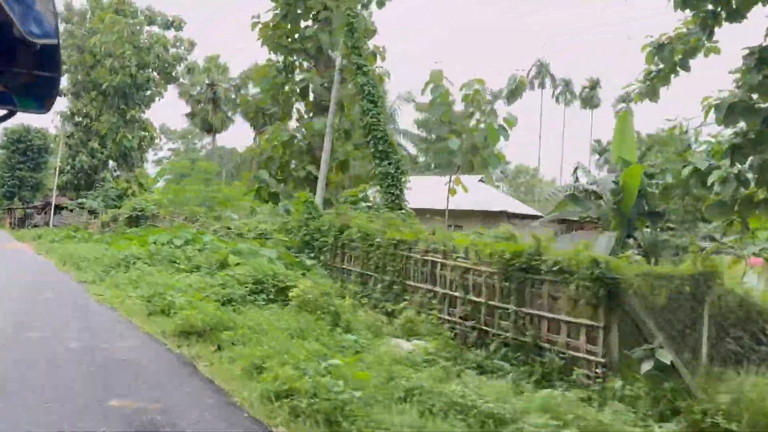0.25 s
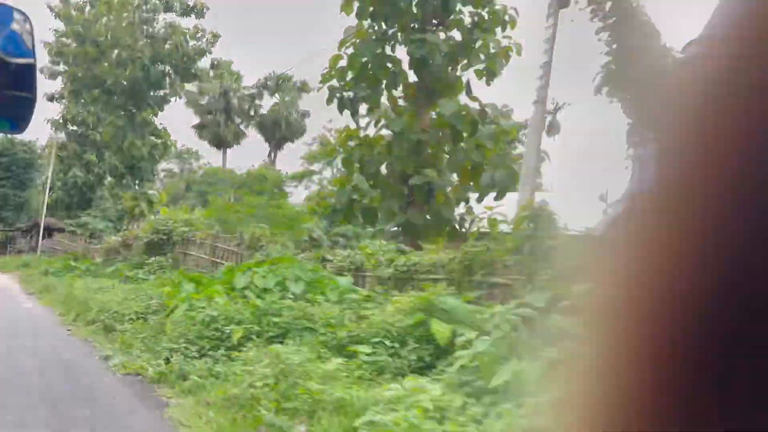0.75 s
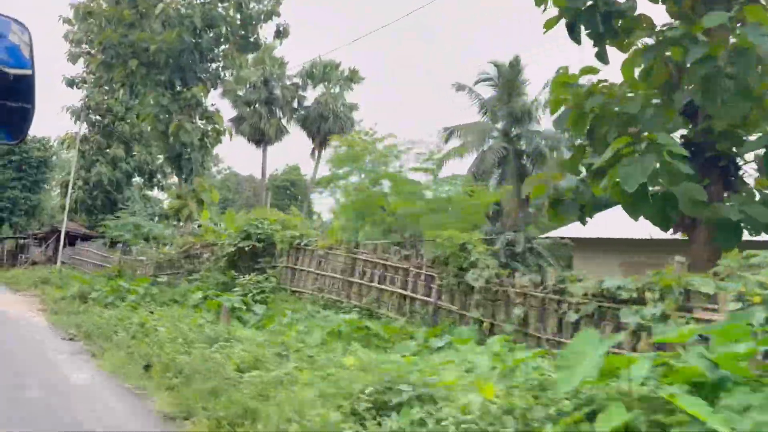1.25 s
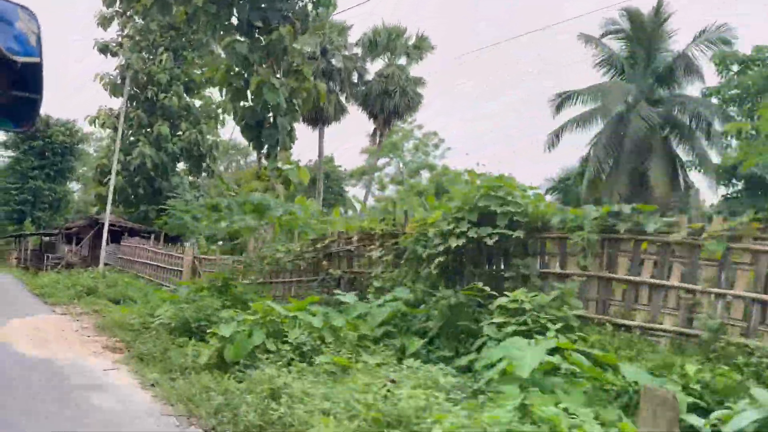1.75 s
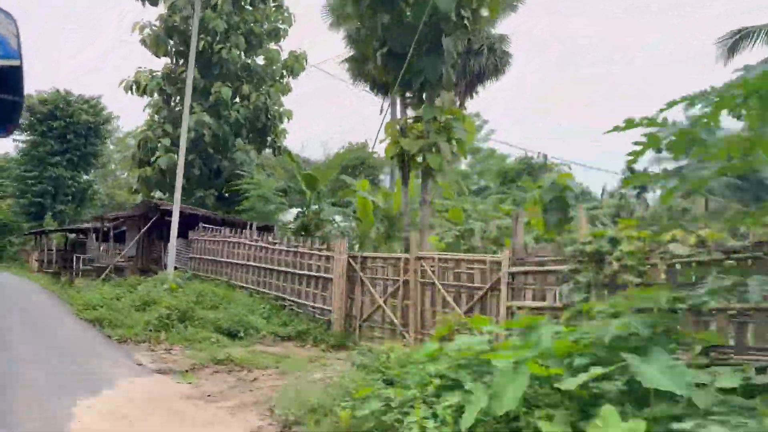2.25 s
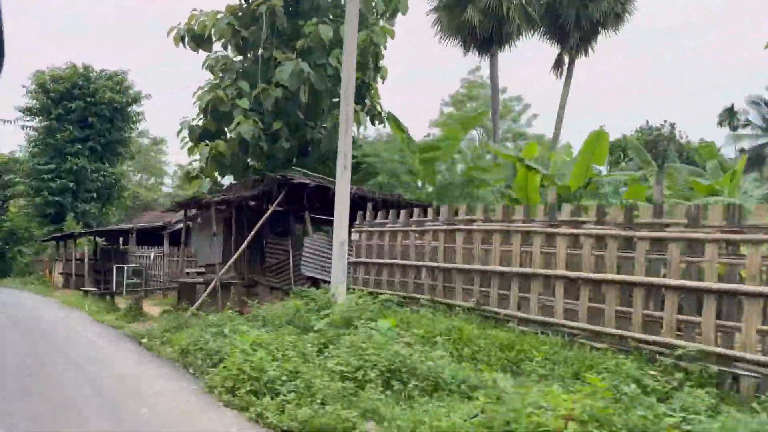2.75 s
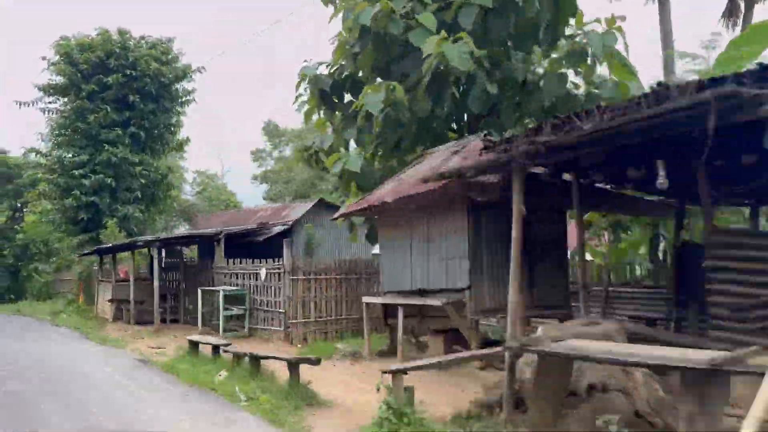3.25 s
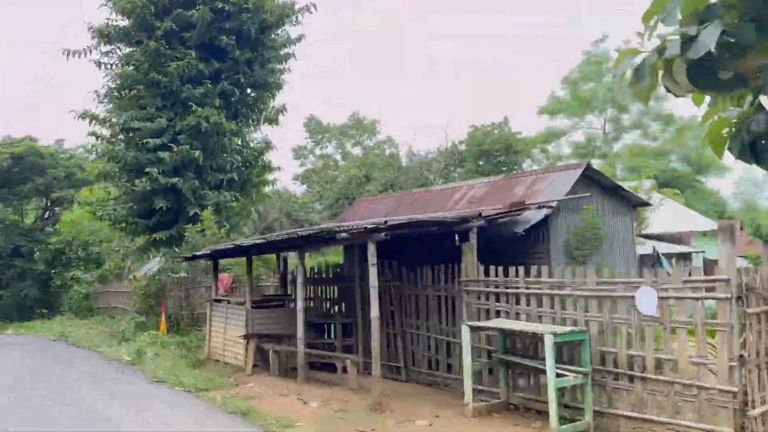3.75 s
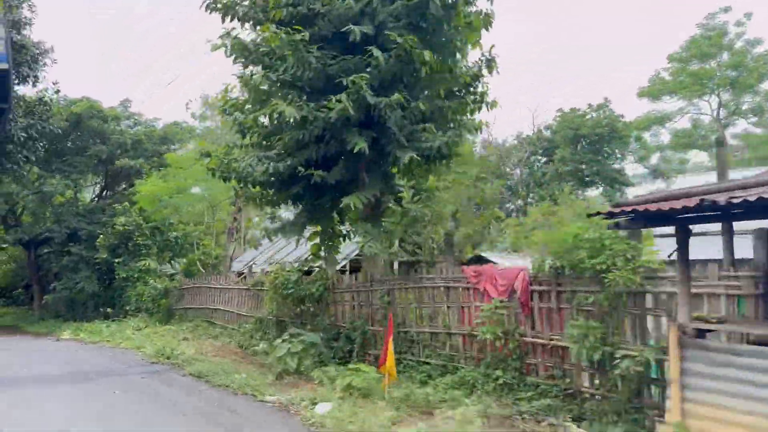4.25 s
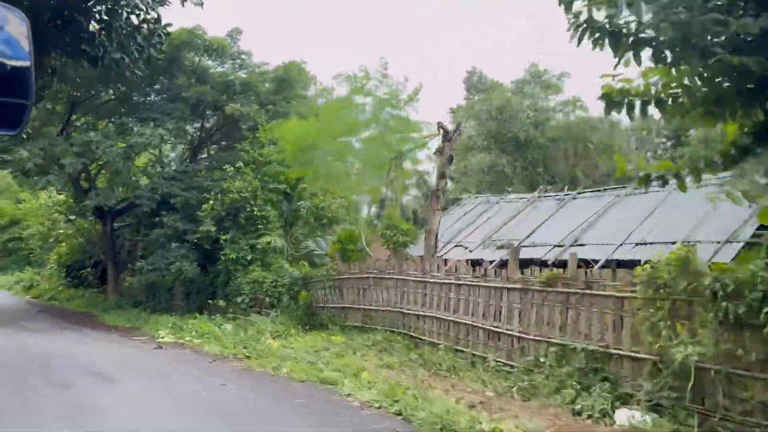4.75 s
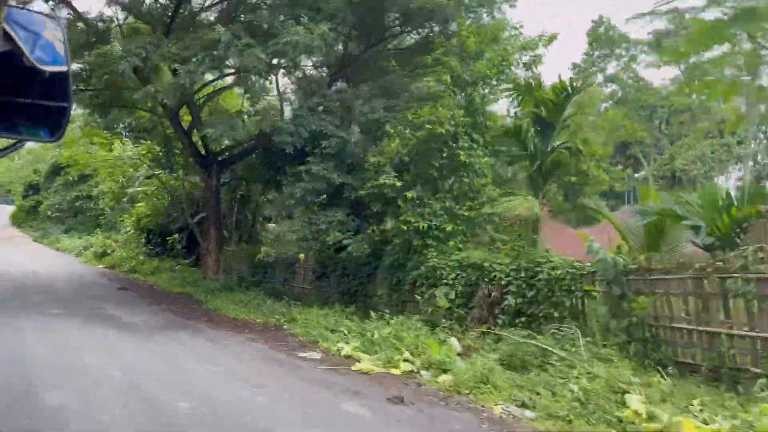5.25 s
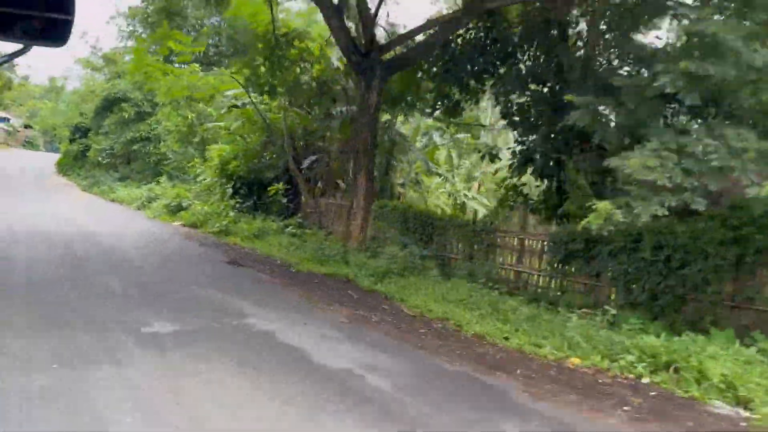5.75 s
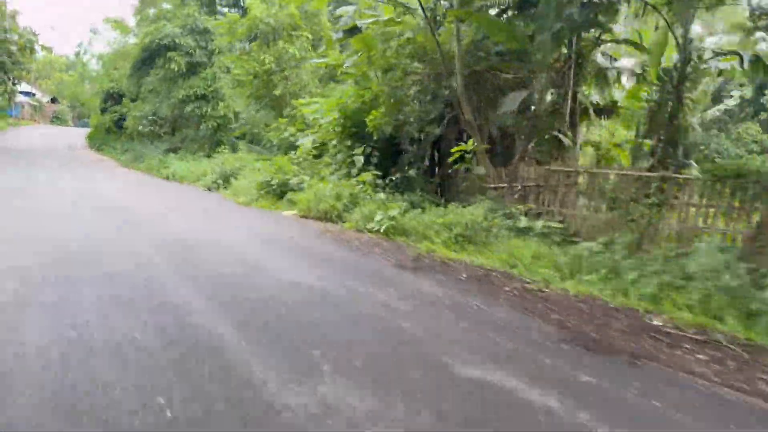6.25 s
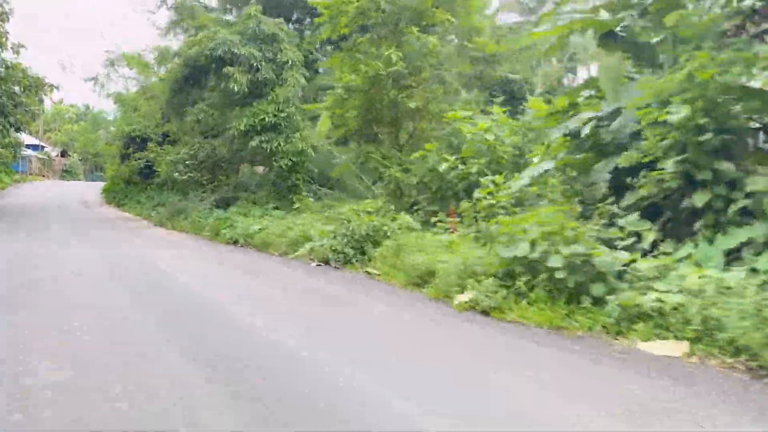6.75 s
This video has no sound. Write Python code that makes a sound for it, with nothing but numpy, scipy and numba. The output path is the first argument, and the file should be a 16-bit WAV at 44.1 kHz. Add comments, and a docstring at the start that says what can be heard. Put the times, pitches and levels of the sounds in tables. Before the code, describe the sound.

Close, slightly overloaded wind noise on an exposed phone microphone, in stereo, outdoors in a moving vehicle. Low gusts surge and sink while brighter crackles spit in clusters, thickest in the opening half second and the last two seconds. Behind it lies a quiet, slowly rising hiss of tyres and motor, with a few barely audible thin whistles, perhaps roadside birds or insects.

```python
"""A village road, from a phone held out of a small vehicle: the head wind tumbles over its microphone ports.
Big eddies rumble and smaller ones flutter, as noise whose level and treble wander with the wind.
The sharpest burst as crackling pops, noise bursts that start bright and end in a thump.
Tyres and motor hiss underneath as steady filtered noise; a few faint whistles, wavering sines, pass by."""
import sys
import numpy as np
from scipy import signal
from scipy.fft import rfft, irfft
from scipy.io import wavfile
from scipy.ndimage import uniform_filter1d
from numba import njit

SR = 44100
rng = np.random.default_rng(int(sys.argv[2]) if len(sys.argv) > 2 else 0)


def put_to_file(sound):
    """Save the sound as 16-bit audio at rate SR, in the file named by the first command-line argument."""
    columns = np.atleast_2d(sound).T  # one column per channel
    safe = np.clip(columns, -1, 1)
    whole_steps = np.round(safe * 32767)
    wavfile.write(sys.argv[1], SR, whole_steps.astype(np.int16))


N = 309141  # samples, about 7 s


def undb(db):
    """Decibels to amplitude."""
    return 10 ** (np.asarray(db) / 20)


def unit(x):
    """Scale to an rms of 1."""
    return x / np.sqrt(np.mean(x ** 2))


def noise(shape):
    """Noise of rms 1 with a spectrum given as (Hz, dB) points."""
    hz, db = np.transpose(shape)
    bins = np.fft.rfftfreq(N, 1 / SR) + 1  # 1 Hz up, to keep the logarithm finite
    gain = undb(np.interp(np.log(bins), np.log(hz), db, right=-150))
    return unit(irfft(rfft(rng.standard_normal(N)) * gain, N))


def walk(rate):
    """Random levels, each held 1 / rate s, then slewed twice; spread 1."""
    hold = max(int(SR / rate), 2)
    steps = np.repeat(rng.standard_normal(N // hold + 1), hold)
    return unit(uniform_filter1d(uniform_filter1d(steps, hold), hold)[:N])


def even(x, ms):
    """Iron out the chance swells of a noise over a few ms, so that an envelope sets its level."""
    return x / np.sqrt(uniform_filter1d(x ** 2, int(ms * SR / 1000)) + 0.22)


@njit
def lowpass(x, hz):
    """State-variable low-pass whose corner moves every sample."""
    y, band, low = np.empty(len(x)), 0., 0.
    for i in range(len(x)):
        g = np.tan(np.pi * hz[i] / SR)
        v = (band + g * (x[i] - low)) / (1 + g * (g + 1.4))
        y[i] = low + g * v
        band, low = 2 * v - band, low + 2 * g * v
    return y


# The wind at the phone between the puffs. Each row: time in seconds, rumble level in dB, flutter level in dB.
WIND = [(0, -24.5, -32), (.5, -31.5, -35.5), (.9, -28, -32.5), (1.1, -29, -37.5), (1.55, -29, -35),
        (1.72, -31, -40.5), (2.03, -29, -32), (2.18, -39, -39), (2.32, -40.5, -36.5), (2.45, -26.5, -32),
        (2.58, -35, -38.5), (2.66, -32, -30.5), (2.74, -35, -37.5), (2.85, -27, -31), (3.0, -28.5, -33),
        (3.65, -27.5, -33.5), (3.95, -33.5, -37.5), (4.15, -32, -34.5), (4.33, -30.5, -34.5),
        (4.6, -26, -29.5), (4.82, -27, -29), (5.1, -26, -32.5), (5.25, -33, -40.5), (5.45, -29.5, -35),
        (5.75, -27, -32.5), (6.0, -26.5, -29), (6.5, -23.5, -27.5), (7.01, -25, -30)]


def wind():
    """The slow course of the wind, as rumble and flutter levels in dB joined by straight lines."""
    s, *columns = np.transpose(WIND)
    return [np.interp(np.arange(N) / SR, s, column) for column in columns]


# The spectrum of the big eddies at the microphone. Each row: frequency in Hz, level in dB per Hz.
RUMBLE = [(20, -18), (40, -1.5), (62, 0), (90, -2.5), (150, -13.5), (300, -19), (600, -59)]


def rumble(throb):
    """Big eddies press on the exposed port as evened deep noise; the throb is its amplitude."""
    return throb * even(noise(RUMBLE), ms=73)


# The spectrum of the smaller eddies, before the moving low-pass. Each row: frequency in Hz, level in dB per Hz.
FLUTTER = [(40, -68), (110, -18), (200, -11.5), (500, -12.5), (1200, -18.5), (4000, -28.5), (9000, -26.5)]


def flutter(db, corner_hz, swing_db):
    """Eddies sweep past at an uneven speed: fast ones are louder and brighter, slow ones dull and smooth."""
    speed = 0.18 * walk(25) + 0.66 * walk(80) + 0.81 * walk(300)
    speed = 1.6 * np.tanh(speed / 1.68)  # the sharpest eddies are the pops
    brightness_db = swing_db * speed + 0.38 * (db - db.mean())
    corner = np.clip(corner_hz * undb(brightness_db), 60, 4000)
    eddies = lowpass(lowpass(noise(FLUTTER), corner), 5.7 * corner)
    return undb(db) * unit(undb(4.96 * speed) * eddies)


# The spectrum of the low buffets. Each row: frequency in Hz, level in dB per Hz.
BUFFET = [(50, -13), (100, 0), (200, -1), (450, -32)]


def buffets(lull_db):
    """Separate low buffets on the exposed port: low noise that surges and sinks by itself."""
    surge_db = 10.2 * np.tanh(walk(30))
    return undb(lull_db - 11.0 + surge_db) * noise(BUFFET)


# How the exposed port reaches the left channel. Each row: frequency in Hz, gain in dB, phase lead in radians.
LEFT_EAR = [(0, -1.5, -.1), (500, -2, .9), (950, -6, 1.6), (1400, -13, -.3), (2200, -15, -1.1),
            (2800, -14, -1.3), (4600, -9, -.6), (5200, -8, -1.3), (6700, -4, .4), (7100, -11, 1.2),
            (7400, -2, 2.7), (8100, 0, 3.14), (16000, 0, 15.9)]


def both_ears(port):
    """The phone mixes one port into both channels: the left is phase shifted and weaker at 1 to 7 kHz."""
    hz, db, lead = np.transpose(LEFT_EAR)
    bins = np.fft.rfftfreq(N, 1 / SR)
    ear = undb(np.interp(bins, hz, db)) * np.exp(1j * np.interp(bins, hz, lead))
    return np.array([irfft(rfft(port) * ear, N), port])


# The spectrum of the road below the vehicle. Each row: frequency in Hz, level in dB per Hz.
ROAD = [(300, -12), (700, -16.5), (1000, -18), (1300, -10), (1800, -15.5), (2200, -18), (2700, -21.5),
        (3250, -26), (5000, -30.5), (7000, -36.5), (10200, -40), (11200, -42), (14300, -43.5), (15700, -51)]
ROAD_DB, SPEED_UP_DB_PER_S = -44, 0.98  # level halfway through, before gusts and wander; its steady climb
ONE_PORT_HZ = 7300  # above this, a single port serves both channels


def road(gust_db):
    """Tyre and motor hiss: unrelated left and right, but the treble comes from a single port."""
    low = signal.butter(6, ONE_PORT_HZ, fs=SR, output="sos")
    high = signal.butter(6, ONE_PORT_HZ, "high", fs=SR, output="sos")
    apart = signal.sosfilt(low, [noise(ROAD), noise(ROAD)]) * undb([[-1.5], [1.5]])
    hiss = apart + both_ears(signal.sosfilt(high, noise(ROAD)))
    climb_db = SPEED_UP_DB_PER_S * (np.arange(N) - N / 2) / SR
    slow_db = uniform_filter1d(gust_db, SR)
    rush_db = 0.061 * (slow_db - slow_db.mean())  # air rush joins in over long gusts
    return undb(ROAD_DB + climb_db + rush_db + 1.2 * walk(9)) * hiss


# The pops one can point at, close on the microphone port. Each row: start in seconds, crackle level in dB,
# crack minus crackle in dB, thump minus crackle in dB, length scale in ms; pops() trims each layer further.
POPS = [(0.0018, -18, 2.5, -7.5, 8.2), (0.0422, -15.5, -30, 0.5, 0.93), (0.0548, -22, 6.5, -21, 3),
        (0.127, -33, -11, -1, 2), (0.141, -25.5, -22, 3.5, 6.5), (0.207, -23, -25, -14, 5.1),
        (0.215, -28, -16, -16, 2.5), (0.248, -18.5, -11, -2, 2.9), (0.254, -18.5, -9, -18, 4.5),
        (0.2747, -20.5, -5, -4, 5.5), (0.29, -19, -22, -28, 2.6), (0.3, -25, -12, -21, 2.7),
        (0.336, -16.5, -9, -22, 1.6), (0.3477, -16, -6, -25, 2), (0.401, -26, -20, 5, 1.5),
        (0.41, -21.5, -27, 5.5, 3), (0.432, -27, -23, 0, 2.2), (0.441, -20.5, -8, -3, 5.4),
        (0.493, -29, -28, 14, 1.6), (0.532, -19.5, -6, 4, 6.9), (0.6055, -22, -11, 8, 4.4),
        (0.696, -41, -18, 16.5, 3.3), (0.751, -29, -14, -9, 2), (0.7643, -33.5, -23, 7, 2.7),
        (1.044, -13, 2, 3.5, 4.3), (1.114, -23, -19, 2, 5.1), (1.1242, -31, -19, 5, 2.7),
        (1.2023, -29.5, -19, 9.5, 3.2), (1.2427, -18, -6.5, -15, 8.1), (1.263, -28, 4, -8, 2.6),
        (1.3037, -20.5, -7, 0.5, 6.2), (1.3374, -28, -8, 3, 2.1), (1.396, -35, -7, -11, 1.3),
        (1.4049, -23, 0, 7, 3.3), (1.494, -28, -10, 3.5, 5.2), (1.551, -27, -9, -21, 2.3),
        (1.575, -24, -13, -6, 2.6), (1.638, -21, 2.5, 0.5, 7.2), (1.7518, -24, -22, 2, 3.5),
        (1.7612, -24.5, -5, 3.5, 7.2), (1.8614, -25, -4, 9.5, 5.9), (1.941, -23, -34, 3.5, 10.5),
        (2.0366, -28.5, -37, 8.5, 2.9), (2.3435, -36, -30, 9, 5.6), (2.3922, -22.5, -26, 2.5, 3.4),
        (2.408, -27, -22, 11, 1.7), (2.462, -23.5, -22, -4, 2.2), (2.477, -29.5, -22, 7, 3.8),
        (2.6271, -31.5, -20, 7, 2.1), (2.661, -28, -50, 5, 4.3), (2.6738, -25, -47, 3.5, 8.6),
        (2.688, -29, -18, -2, 2.8), (2.7911, -28.5, -29, 14.5, 1.1), (2.845, -25.5, -24, 6, 5.7),
        (2.8855, -20.5, -23, -9, 3.1), (2.9611, -18.5, -22, 0, 1.26), (3.003, -17, -13, -7, 2),
        (3.05, -25, -15, -10, 6.5), (3.066, -24.5, -31, 5.5, 3.7), (3.134, -24.5, -10, -9, 3.6),
        (3.144, -24, -8, -5, 6.6), (3.2653, -24, -7.5, 3, 5.5), (3.2818, -28, -27, -8, 4),
        (3.3532, -30, -18, -17, 3), (3.367, -28.5, -12, 4.5, 6.7), (3.394, -27.5, -9, -2, 4.3),
        (3.477, -25.5, -19, 4, 2.4), (3.6559, -22, -6.5, 3.5, 4.5), (3.702, -28, -24, 10.5, 2.3),
        (3.7691, -24, -5.5, 0, 4), (3.8158, -29, -20, -12, 1.6), (3.844, -28, -26, 2, 2.3),
        (4.045, -36.5, -39, 5.5, 4.8), (4.07, -29.5, -28, 4, 7.1), (4.172, -29, -32, 2.5, 2.6),
        (4.184, -25, -40, 4, 4.7), (4.2299, -22.5, 1.5, -0.5, 9.7), (4.3825, -38, -58, 6, 4.9),
        (4.519, -20, -4.5, -2.5, 7.1), (4.529, -20, -2, -26, 2.8), (4.579, -17, -10, -9, 3.6),
        (4.603, -24.5, -12, -1.5, 7.8), (4.624, -22, -18, -1, 2.2), (4.638, -32, -18, -11, 2),
        (4.668, -11, -8, -35, 3.4), (4.674, -23, 3, -22, 3.9), (4.738, -18.5, 11.5, 3, 4),
        (4.7608, -14.5, -31, -2, 2.8), (4.788, -24, -32, 15, 1.3), (4.918, -23, -17, 1.5, 3),
        (4.963, -27, -15, -4, 16), (5.013, -26, 2, -17, 1.2), (5.023, -21, -0.5, -4, 7.7),
        (5.0318, -14, -15, -6.5, 6), (5.05, -27, -18, 3, 3.1), (5.0733, -14, 0.5, -4, 5.1),
        (5.082, -16.5, 5, -17, 2.6), (5.098, -32, -20, -4, 1.5), (5.12, -21.5, -37, 9.5, 0.93),
        (5.135, -23.5, -22, -1, 1.6), (5.312, -30.5, -40, 0.5, 15), (5.502, -28, -49, 0, 3.8),
        (5.555, -19.5, -23, 0.5, 6.6), (5.5688, -29, -19, 7.5, 11), (5.589, -19, -17, -4, 2.4),
        (5.666, -18.5, -32, -7, 0.81), (5.6936, -23, -40, 0, 5.8), (5.772, -28, -44, 9.5, 7.5),
        (5.784, -28, -18, 0, 2.5), (5.7946, -22.5, -5, -6, 2.7), (5.801, -16.5, -7, -4, 2),
        (5.828, -20, -21, -23, 4.3), (5.8416, -15.5, -28, -1, 3.4), (5.863, -16.5, -26, 7, 2),
        (5.8937, -15.5, -10, 0, 5.5), (5.907, -35, 14, -9, 1.3), (5.941, -26, -22, -13, 3.2),
        (5.977, -20, -13, 0, 6.7), (6.007, -15, -2, -2, 8.1), (6.02, -34, -10, -7, 3.9),
        (6.028, -19.5, -22, -9, 3.6), (6.0807, -24, -14, -8, 1.7), (6.093, -24.5, -20, -4, 12),
        (6.117, -21.5, -18, 3, 6.8), (6.165, -25.5, -20, 10, 1.8), (6.184, -30, -8, 12.5, 4.9),
        (6.238, -17, 7.5, 2, 1.4), (6.289, -23, -20, 6, 2.7), (6.302, -19, -16, 5, 1.7),
        (6.314, -32, -15, -7, 1.5), (6.353, -23.5, 4, -25, 3.3), (6.364, -20, -9, -16, 2),
        (6.3733, -17, -13, -11, 5), (6.405, -36.5, -51, 17, 3.3), (6.436, -26, -8, -7, 2.2),
        (6.4543, -37, -15, -7, 3), (6.486, -18.5, -23, -2, 3.2), (6.493, -21, -18, -15, 1.2),
        (6.5464, -21, -9, -4, 9.1), (6.641, -23.5, -17, 2, 8.5), (6.747, -55, 3, 22, 5.9),
        (6.815, -21, -12, 9.5, 4.5), (6.931, -25, -14, 4.5, 3.5), (6.981, -19.5, -4, -3, 6.2)]
# a puff starts this long before its pop, dies away at this time constant, and nears full at this thump level
PUFF_LEAD_S, PUFF_FADE_S, PUFF_FULL_DB = 0.016, 0.019, -27.5
PUFF_FLUTTER_DB, PUFF_RUMBLE_DB = 7, 4  # lift by a full puff


def puffs():
    """Each marked pop rides a puff of air, 0 in the lulls, towards 1 when its thump is strong."""
    s, db, _, thump_db, _ = np.transpose(POPS)
    kicks = np.zeros(N)
    kicks[(s * SR).astype(int)] = undb(db + thump_db - PUFF_FULL_DB)
    fading = signal.lfilter([1], [1, -np.exp(-1 / (PUFF_FADE_S * SR))], kicks)
    return np.tanh(uniform_filter1d(fading, int(2 * PUFF_LEAD_S * SR)))


SMALL_POPS = 260  # how many
SMALL_DB, SMALL_SPREAD_DB = -2, -0.5  # crackle level over the flutter, and its spread
SMALL_CRACK_DB, SMALL_THUMP_DB, COLOUR_SPREAD_DB = -26, 0, 4  # over the crackle, and the spread of both
SMALL_MS, SMALL_LENGTH_SPREAD = 1.1, .45  # median length, and spread of its natural logarithm


def small_pops(flutter_db):
    """Lesser pops at chance moments, as strong as the wind is just then; rows as in POPS."""
    i = (rng.random(SMALL_POPS) * N).astype(int)
    size, bright, deep, long = rng.standard_normal((SMALL_POPS, 4)).T
    crackle_db = flutter_db[i] + SMALL_DB + SMALL_SPREAD_DB * np.tanh(size)
    crack_db = SMALL_CRACK_DB + COLOUR_SPREAD_DB * bright
    thump_db = SMALL_THUMP_DB + COLOUR_SPREAD_DB * deep
    ms = SMALL_MS * np.exp(SMALL_LENGTH_SPREAD * long)
    return np.transpose([i / SR, crackle_db, crack_db, thump_db, ms])


def bursts(table, db, rise, fall):
    """Envelope of all pops; rise and fall are shares of each pop's length."""
    out = np.zeros(N)
    for (s, *_, ms), size in zip(table, undb(db)):
        t = np.arange(int(.08 * SR)) / (SR * max(ms, .5) / 1000)  # in pop lengths
        shape = (1 - np.exp(-t / rise)) * np.exp(-(t / fall) ** 2)
        i = int(s * SR)
        out[i:i + len(t)] += size * (shape / shape.max())[:max(N - i, 0)]
    return out


# The spectra of a pop's layers at the microphone. Each row: frequency in Hz, level in dB per Hz.
CRACK = [(2000, 7), (4500, 4.5), (7500, -3.5), (10500, -14.5), (15500, -29)]
CRACKLE = [(200, -27), (500, 5), (1000, 2.5), (2000, -2), (3500, -11.5), (6000, -30), (10000, -52)]
THUMP = [(45, -50), (110, 21), (250, 20.5), (500, 14), (1000, -9)]
WAKE_LEAD_S = 0.0049


def pops(table):
    """Each eddy cracks, crackles in uneven spits, thumps and booms as it slows, inside a ragged early swell."""
    _, db, crack_db, thump_db, _ = np.transpose(table)
    spits = 1.17 * np.tanh(walk(600))
    crack_noise = even(unit(undb(8.0 * spits)) * noise(CRACK), ms=6.8)
    crack = bursts(table, db + crack_db - 2.5, rise=0.097, fall=0.79) * crack_noise
    crackle_noise = even(unit(undb(7.0 * spits)) * noise(CRACKLE), ms=6.3)
    crackle = bursts(table, db, rise=0.26, fall=1.34) * crackle_noise
    thump = bursts(table, db + thump_db, rise=1.0, fall=1.46) * even(noise(THUMP), ms=8.6)
    boom = bursts(table, db + thump_db - 6.5, rise=5.3, fall=3.9) * even(noise(RUMBLE), ms=32.5)
    swell = np.roll(bursts(table, db - 10.5, rise=1.9, fall=3.27), -int(WAKE_LEAD_S * SR))
    wake = swell * even(unit(undb(8.9 * walk(300))) * noise(CRACKLE), ms=15.0)
    return crack + crackle + thump + boom + wake


# Faint notes: a few off at the roadside, and one near 1.3 kHz ringing from the road below. Each row: start in
# seconds, # end in seconds, start pitch in Hz, end pitch in Hz, level in dB.
WHISTLES = [(.688, .755, 3660, 3530, -61), (.772, .878, 3690, 3750, -62), (2.5, 2.6, 1340, 1330, -49),
            (6.47, 6.9, 5165, 5150, -61)]


def whistles():
    """Thin sines wavering in pitch and level: perhaps birds and insects at the roadside, and a brief ring of
    the road near 1.3 kHz."""
    t, out = np.arange(N) / SR, 0
    for t0, t1, hz0, hz1, db in WHISTLES:
        arch = np.sin(np.pi * np.clip((t - t0) / (t1 - t0), 0, 1)).clip(0) ** .3
        fade = arch * undb(db + 1.5 * walk(40))
        hz = np.interp(t, [t0, t1], [hz0, hz1]) * (1 + .003 * walk(60))
        out = out + fade * np.sin(2 * np.pi * np.cumsum(hz) / SR)
    return out


def scene():
    """The wind on an exposed and a sheltered port, over the road and the whistles; left and right."""
    rumble_db, lull_db = wind()
    puff = puffs()
    flutter_db = lull_db + PUFF_FLUTTER_DB * puff
    throb = undb(rumble_db + PUFF_RUMBLE_DB * (puff - puff.mean()) + 5.1 * np.tanh(walk(22)))
    exposed = rumble(throb) + flutter(flutter_db, corner_hz=780, swing_db=3.5) + buffets(lull_db)
    exposed = exposed + pops(np.vstack([POPS, small_pops(flutter_db)]))
    # the sheltered port gets weaker, duller eddies of its own, mostly on the left
    sheltered = undb(-8.5) * throb * (noise(RUMBLE) + noise(BUFFET))
    sheltered = sheltered + flutter(flutter_db - 7.5, corner_hz=735, swing_db=2.5)
    wind_noise = both_ears(exposed) + sheltered * np.array([[.8], [-.45]])
    return wind_noise + road(flutter_db) + whistles()


TOP_HZ = 15500  # the phone passes nothing much above this


def record(dry):
    """The phone cuts the deepest bass, rounds the peaks and cuts the top."""
    cut = signal.sosfilt(signal.butter(2, 35, "high", fs=SR, output="sos"), dry)
    rounded = np.tanh(2.088 * cut) / 2.462
    return signal.sosfilt(signal.ellip(8, .2, 70, TOP_HZ, fs=SR, output="sos"), rounded)


dry = scene()
out = record(dry)
put_to_file(out)
```